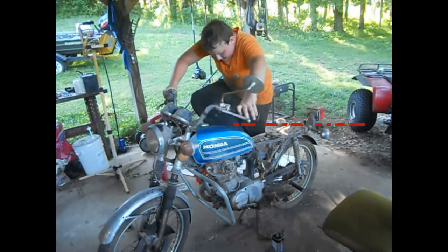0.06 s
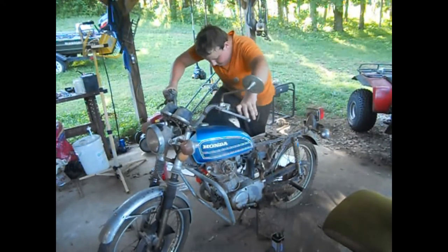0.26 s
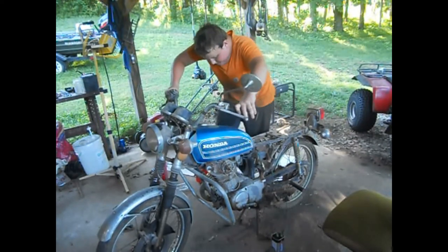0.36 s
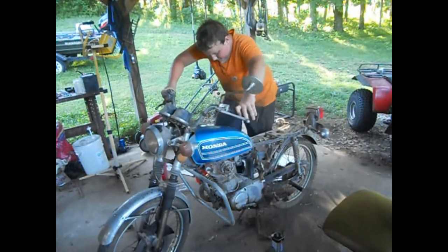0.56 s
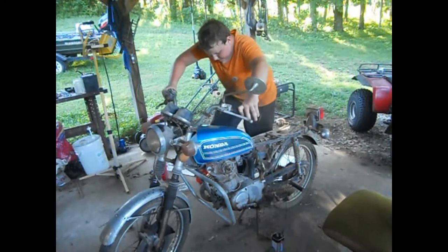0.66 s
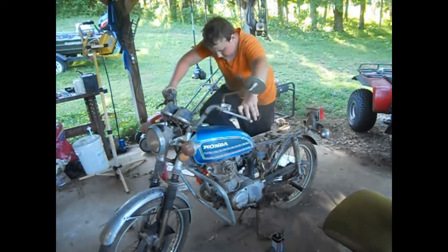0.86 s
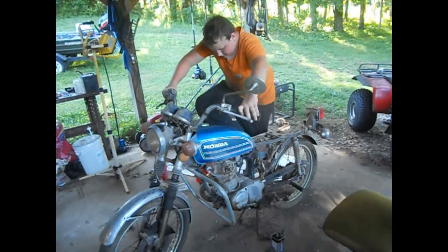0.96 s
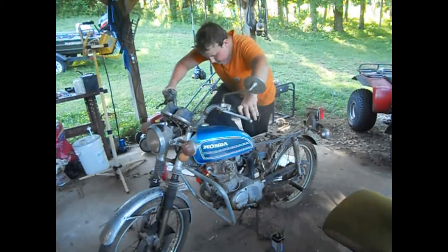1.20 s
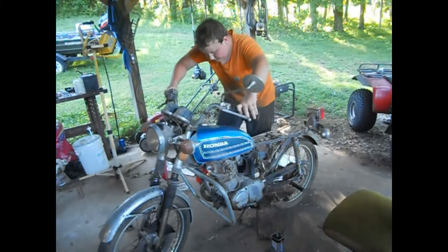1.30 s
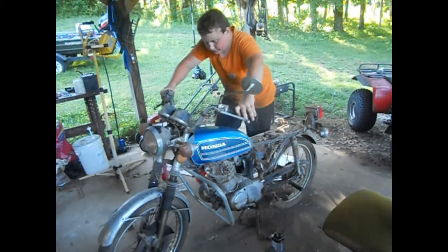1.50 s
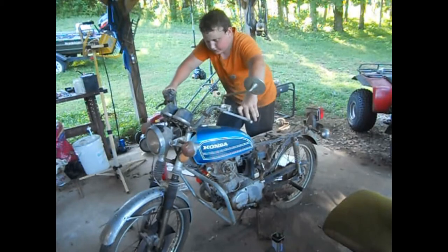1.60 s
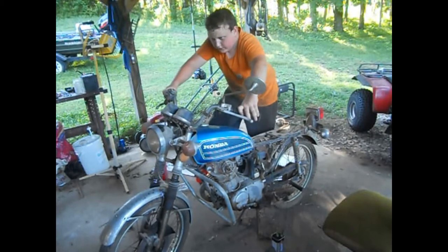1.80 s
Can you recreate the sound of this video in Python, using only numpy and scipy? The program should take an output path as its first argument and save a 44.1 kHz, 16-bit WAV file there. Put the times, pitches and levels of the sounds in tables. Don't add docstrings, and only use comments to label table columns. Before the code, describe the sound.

Motorcycle kick-starter stomped two times: metallic clacks, gear whirr, dull exhaust puffs, no ignition.

```python
import sys
import numpy as np
from scipy import signal
from scipy.fft import rfft, irfft
from scipy.io import wavfile
from scipy.ndimage import uniform_filter1d

SR = 44100
rng = np.random.default_rng(int(sys.argv[2]) if len(sys.argv) > 2 else 0)


def persist_wave(psi):
    counts = np.round(np.clip(psi, -1, 1) * 32767).astype(np.int16)
    wavfile.write(sys.argv[1], SR, np.atleast_2d(counts).T)


def volts_from_decibels(level):
    exponent = np.asarray(level, float) / 20
    return 10 ** exponent


N = 81585


def level(x, db):
    return x * volts_from_decibels(db) / np.sqrt(np.mean(x ** 2))


def colour(x, points):
    hz, db = np.array(points).T
    f = np.maximum(np.arange(N // 2 + 1) * SR / N, 1)
    gain = volts_from_decibels(np.interp(np.log(f), np.log(hz), db))
    return irfft(rfft(x) * gain, N)


def band(x, hz, width):
    return signal.lfilter(*signal.iirpeak(hz, hz / width, fs=SR), x)


def split_filter(order, hz, kind="low"):
    return signal.butter(order, hz, kind, fs=SR, output="sos")


def ring(x, hz, t60):
    pole = np.exp(2j * np.pi * hz / SR - np.log(1000) / (t60 * SR))
    return signal.lfilter([1], [1, -pole], x).imag


def walk(rate):
    hold = int(SR / rate)
    steps = np.repeat(rng.standard_normal(N // hold + 1), hold)
    smooth = uniform_filter1d(uniform_filter1d(steps, hold), hold)
    return level(smooth[:N], 0)


def hits(events, modes):
    rise_s, rattle_t60_s = 0.000883, 0.2
    ring_samples = 5000
    t = np.arange(12000) / SR
    attack = 1 - np.exp(-t / rise_s)
    out = np.zeros(N + len(t))
    for s, db, low_db, bright_db, contact in events:
        push = rng.standard_normal(len(t)) * attack * np.exp(-t / contact)
        drive = push * np.exp(-t / (contact * 0.6))
        drive[int(rise_s * SR)] += volts_from_decibels(9)
        loose = rng.standard_normal(len(t)) * attack
        rattle = push + volts_from_decibels(-15.5 - 60 * t / rattle_t60_s) * loose

        body = 0
        for hz, mode_db, t60 in modes:
            detune = 1 + 0.018 * rng.uniform(-1, 1, size=4)
            part = sum(ring(drive[:ring_samples], hz * d, t60) for d in detune)
            tone_db = low_db if hz < 1500 else bright_db if hz > 4500 else 0
            body = body + part / abs(part).max() * volts_from_decibels(mode_db + tone_db)
        body = np.pad(body, (0, len(t) - ring_samples))

        crack = band(rattle, 2380, 1750) + volts_from_decibels(bright_db) * band(rattle, 6460, 8240)
        hit = body / 4.13 + volts_from_decibels(-2) * crack / abs(push).max()
        i = int(s * SR)
        out[i:i + len(t)] += volts_from_decibels(db) * hit
    return out[:N]


# (frequency [Hz], level [dB per Hz])
AIR_TONE = [(18, -55), (30, -4), (178, -10), (309, -9), (417, -7.5), (639, -13.5), (761, -12),
            (5660, -19.5), (12000, -22.5), (15600, -42), (22000, -120)]


def air():
    hush = level(colour(rng.standard_normal(N), AIR_TONE), -49.5)
    hush = hush * volts_from_decibels(np.linspace(1, -4.5, N) + 0.12 * walk(3.0))
    hum = level(band(rng.standard_normal(N), 120, 1.0), -66)
    insects = level(band(rng.standard_normal(N), 7960, 250.), -72) * volts_from_decibels(0.69 * walk(16.4))
    return hush + hum + insects


# (time [s], peak level [dB], low part [dB], bright part [dB], contact [s])
PAWL_HITS = [
    (0.1089, -26.5, 0.5, 0.5, 0.0011),
    (1.0978, -34, -6, 7.5, 0.004),
    (1.1635, -33, -19, 5.5, 0.0073),
]
# (frequency [Hz], level [dB], t60 [s])
PAWL_MODES = [(1100, -3, .03), (3100, 0, .05), (3480, -4, .05), (4100, -6, .03), (6400, -2, .03),
              (7100, -5, .03), (7800, -6, .04)]


def pawl_clicks():
    return hits(PAWL_HITS, PAWL_MODES)


# (length [s], centre [Hz], width [Hz], level [dB])
SCRAPES = [(0.04, 545, 90, -50), (0.046, 2900, 950, -47), (0.065, 900, 700, -51), (0.051, 7800, 750, -53),
           (0.059, 7200, 760, -58.5), (0.026, 5500, 440, -62), (0.025, 8100, 500, -43),
           (0.06, 3200, 400, -50), (0.041, 3220, 490, -53.5), (0.12, 3000, 420, -45), (.055, 403, 60, -53),
           (.13, 110, 90, -49), (.2, 90, 80, -56), (.04, 110, 70, -49), (.075, 1050, 350, -39),
           (.12, 480, 140, -44), (.04, 405, 90, -39), (.025, 5800, 400, -40), (.06, 600, 250, -55)]
SCRAPE_STARTS = [.682, .63, 1.728, 1.115, 1.8, .885, 1.229, .11, 1.112, .208, .697, .2, 1.64, 1.185, .207,
                 .21, 1.546, 1.18, .72]


def settling():
    t = np.arange(N) / SR
    out = 0
    for s, (length, hz, width, db) in zip(SCRAPE_STARTS, SCRAPES):
        rub = band(band(rng.standard_normal(N), hz, width), hz, width)
        fade_in, fade_out = (t - s) / 0.006, (s + length - t) / 0.031
        fade = np.clip(np.minimum(fade_in, fade_out), 0, 1)
        out = out + level(rub, db) * volts_from_decibels(3.2 * walk(80)) * fade
    return out


# (time [s], peak level [dB], low part [dB], bright part [dB], contact [s])
ENGAGE_HITS = [
    (.1965, -39, 4, 8, 0.0072),
    (0.2028, -16, -9, 4, 0.0027),
    (.2045, -15, 8.5, -5, 0.0032),
    (1.181, -23.5, -27, 7, 0.0033),
    (1.1845, -19, 7.5, -15, 0.0014),
    (1.194, -42, -11, -11, 0.0025),
    (1.231, -37, -1, -4, .004),
]
# (frequency [Hz], level [dB], t60 [s])
ENGAGE_MODES = [(858, 3, .045), (1100, -10, .06), (2940, -9, .05), (3400, -12, .02), (4900, -12, .015),
                (5820, -4, .04), (6900, -8, .02), (8400, -8, .02), (9500, -8, .02)]


def engage_knocks():
    return hits(ENGAGE_HITS, ENGAGE_MODES)


# (time [s], level [dB], extra hiss [dB])
TURNING_KICKS = [
    [(.199, -45, 22), (.215, -36.5, -10), (.29, -44, 17.5), (.335, -31, 2.5), (.36, -27.5, 8.5),
     (.42, -29, 5), (.47, -25.5, -4), (.5, -38, -4), (.58, -34.5, 2)],
    [(1.185, -33, -2), (1.2, -35, -16), (1.255, -43, -1), (1.275, -32.5, 0), (1.33, -30.5, 1),
     (1.38, -28.5, 0), (1.43, -33, 3), (1.5, -37, -17), (1.6, -47.5, -12)],
]
# (frequency [Hz], level [dB per Hz])
GEAR_TONE = [(200, -13), (340, -9), (450, 2), (1000, 7), (1730, -3), (2850, -2), (5100, -10.5),
             (8230, -9.5), (9940, -10.5), (12000, -15), (22000, -120)]
# (frequency [Hz], level [dB], t60 [s])
CASING_MODES = [(410, -20, .04), (800, -17, .015), (1050, -17, .015), (2950, -20, .02)]


def gears():
    t = np.arange(N) / SR
    struck = rng.random(N) < 4000 / SR
    teeth = level(struck * rng.standard_normal(N), -3) + rng.standard_normal(N)
    sound = level(colour(teeth, GEAR_TONE), 0)
    for hz, casing_db, t60 in CASING_MODES:
        sound = sound + level(ring(teeth, hz, t60), casing_db) * volts_from_decibels(1.5 * walk(40))
    hiss = signal.sosfiltfilt(split_filter(2, 4000, "high"), sound)
    whirr = sound - hiss

    out = 0
    for kick in TURNING_KICKS:
        s, db, hiss_db = np.array(kick).T
        hiss_gain = volts_from_decibels(np.interp(t, s, hiss_db) + 1.8 * walk(69.7))
        mix = whirr * volts_from_decibels(1.8 * walk(59.6)) + hiss * hiss_gain
        speed = volts_from_decibels(np.interp(t, s, db, left=-120, right=-120))
        out = out + mix * uniform_filter1d(speed, size=300)
    return out


# (time [s], peak level [dB], low part [dB], bright part [dB], contact [s])
RATCHET_HITS = [
    (.2472, -29, -8, -8, .004),
    (.3255, -23, -3, -4, .004),
    (.3456, -20, -2, -6, .003),
    (.265, -34, -5, -5, .004),
    (.304, -35, -5, 0, .004),
]
# (frequency [Hz], level [dB], t60 [s])
RATCHET_MODES = [(900, -2, .04), (2880, 0, .05), (3020, 0, .06), (4600, -10, .02), (7500, -10, .015)]


def ratchet_ticks():
    return hits(RATCHET_HITS, RATCHET_MODES)


# (time [s], peak level [dB], return gain of the pipe)
PUFF_EVENTS = [
    (.3701, -10.5, .4),
    (.4946, -15.5, .32),
    (1.2731, -15, .55),
    (1.3831, -14.5, .33),
    (1.5484, -21, .35),
    (1.205, -36, .3),
    (.35, -28, .3),
]
# (delay [s], suction gain, blow gain)
BAFFLE_ECHOES = [(0, 1, 1), (.0078, .85, .2), (.0128, .1, .28)]
# (frequency [Hz], level [dB], t60 [s])
PIPE_MODE = (99, -18, .13)
# (frequency [Hz], level [dB], t60 [s])
SILENCER_MODES = [(410.2, -29.5, 0.38), (480, -26, 0.14), (565, -34.5, 0.13)]


def exhaust():
    suck_s, blow_s, trip_s = 0.0033, 0.0024, 0.0211
    trips = 5
    t = np.arange(N) / SR
    out = np.zeros(N)
    late = 0.0012 * rng.standard_normal((len(PUFF_EVENTS), trips)) * np.arange(trips) / 2
    for trip in range(trips):
        wave = 0
        for (s, db, back), drift in zip(PUFF_EVENTS, late[:, trip]):
            for lag, suck, blow in BAFFLE_ECHOES:
                u = t - s - lag - trip * trip_s - drift
                suction = -suck * 0.68 * np.exp(np.minimum(u, 0) / suck_s)
                blast = blow * np.exp(-np.maximum(u, 0) / blow_s)
                wave = wave + volts_from_decibels(db) * back ** trip * np.where(u < 0, suction, blast)
        out += signal.sosfilt(split_filter(2, 620 / (1 + trip)), wave)

    rings = 0
    for hz, db, t60 in [PIPE_MODE] + SILENCER_MODES:
        rings = rings + volts_from_decibels(db) * ring(out, hz, t60) * 2 * np.pi * hz / SR
    return out + rings


# (time [s], peak level [dB], low part [dB], bright part [dB], contact [s])
VALVE_HITS = [
    (0.352, -9, -25, 3.5, 0.0027),
    (0.3575, -13.5, -5, 5, 0.0031),
    (.397, -22.5, 3, 9, 0.0051),
    (1.299, -15.5, -9, 4, 0.003),
    (1.3095, -15, -8.5, 1, 0.004),
    (1.373, -8, -16, -1.5, 0.004),
    (1.4114, -19, -8, 3.5, 0.0035),
    (1.404, -31, -18, -1, .003),
]
# (frequency [Hz], level [dB], t60 [s])
VALVE_MODES = [(541, 11, 0.036), (930, 6, 0.02), (1890, 6.5, 0.0053), (3197, -4.5, 0.077),
               (4500, -13, 0.0089), (6500, -45, 0.027), (7130, -27, 0.04), (8500, -3, 0.0043),
               (10500, -6, .02), (11450, 3, 0.0091)]


def valve_clacks():
    return hits(VALVE_HITS, VALVE_MODES)


# (time [s], peak level [dB], low part [dB], bright part [dB], contact [s])
CRANK_HITS = [
    (0.4045, -17, 5, -12, 0.003),
    (0.4278, -7, 4, 1, 0.004),
    (.4345, -15, 4, -7, .005),
    (.446, -22, 6, -14, .006),
    (1.3528, -7, 1, 0, 0.003),
    (1.358, -16, -4, 1, .003),
    (1.365, -19, 0, -5, .003),
]
# (frequency [Hz], level [dB], t60 [s])
CRANK_MODES = [(750, -12, 0.08), (1292, 3, 0.065), (1480, -3, 0.02), (1940, -2, 0.04), (2300, -3, 0.035),
               (2834, -5, 0.05), (3200, -7, .03), (4010, -10, 0.02), (5200, -10, .015), (6420, 2, .018),
               (7200, -2, 0.015), (8000, -4, 0.015)]


def crank_clanks():
    return hits(CRANK_HITS, CRANK_MODES)


# (time [s], peak level [dB], low part [dB], bright part [dB], contact [s])
TAPPET_HITS = [
    (.4815, -15.5, -14, 0.89, 0.0082),
    (1.2595, -19, -5, 2.7, 0.013),
    (1.2935, -23.5, 12, 2, 0.0044),
    (1.5305, -25.5, -8, 4.9, 0.0065),
    (1.839, -43, 5, 3, 0.0072),
]
# (frequency [Hz], level [dB], t60 [s])
TAPPET_MODES = [(884, 0, .02), (1960, -2, 0.03), (3100, -5, .015), (7850, -11, 0.035), (8000, 2.5, 0.045),
                (9260, 0.5, 0.028), (10070, 3, .015)]


def tappet_ticks():
    return hits(TAPPET_HITS, TAPPET_MODES)


# (time [s], peak level [dB], low part [dB], bright part [dB], contact [s])
LEVER_HITS = [
    (0.5258, -10.5, -8, 3.7, 0.0018),
    (.5285, -10.5, -3, 3.8, 0.0031),
    (1.4403, -14, -15, 6.1, 0.0049),
    (1.4435, -12, -1.5, 6.4, 0.0024),
]
# (frequency [Hz], level [dB], t60 [s])
LEVER_MODES = [(991, 0, .06), (1954, -6, .04), (2330, -1, .04), (3000, -6, .025), (3800, -1, .035),
               (4970, -6, .015), (6450, 2, .028), (7900, -6, .015), (8590, 1, .016), (9500, -8, .015)]


def lever_slams():
    return hits(LEVER_HITS, LEVER_MODES)


def roof(x):
    low_t60_s, high_t60_s, gap_s = 0.45, 0.32, 0.0095
    t = np.arange(30000) / SR
    noise = rng.standard_normal(len(t))
    low = signal.lfilter([.3], [1, -.7], noise)
    high = noise - low
    tail = low * volts_from_decibels(-60 * t / low_t60_s) + high * volts_from_decibels(-60 * t / high_t60_s)
    tail = tail * (t > gap_s)
    tail = tail / np.sqrt(np.sum(tail ** 2))
    return volts_from_decibels(-8.5) * signal.fftconvolve(x, tail)[:N]


def scene():
    metal = pawl_clicks() + engage_knocks() + ratchet_ticks() + valve_clacks()
    metal = metal + crank_clanks() + tappet_ticks() + lever_slams()
    metal = signal.sosfilt(split_filter(3, 520, "high"), metal)
    puffs = exhaust()
    bike = metal + gears() + settling()
    return (bike + puffs + roof(bike + 0.64 * puffs) + air())[None]


def band_limit(x):
    return signal.sosfilt(signal.butter(12, 12740, fs=SR, output="sos"), x)


# (frequency [Hz], gain [dB])
MIC_TONE = [(25, -6), (75, 0), (9000, 1), (10450, -5), (10800, -12.5), (12200, -23.5), (12700, -36)]


def record(dry):
    steep = signal.ellip(10, .5, 60, 12750, fs=SR, output="sos")
    mix = signal.sosfilt(steep, colour(dry[0], MIC_TONE))
    return band_limit(mix[None])


dry = scene()
out = record(dry)
persist_wave(out)
```